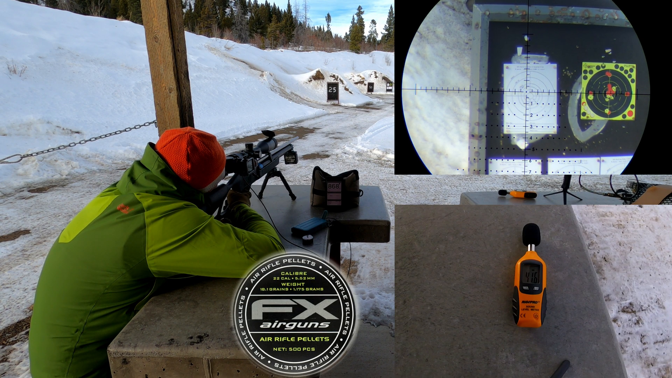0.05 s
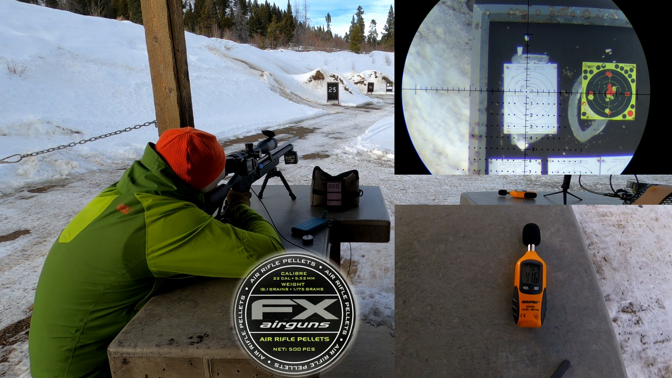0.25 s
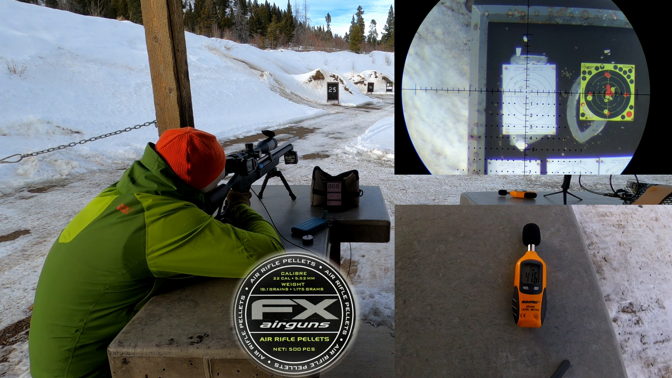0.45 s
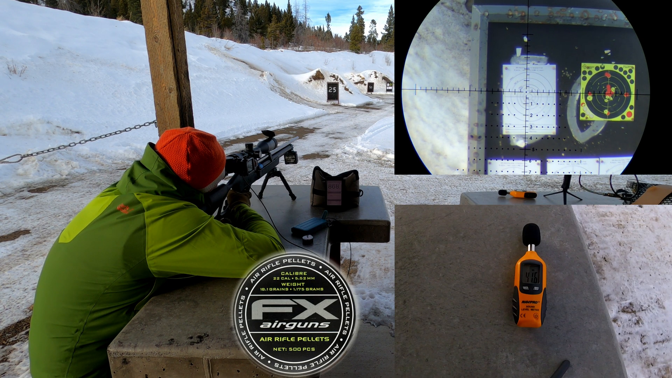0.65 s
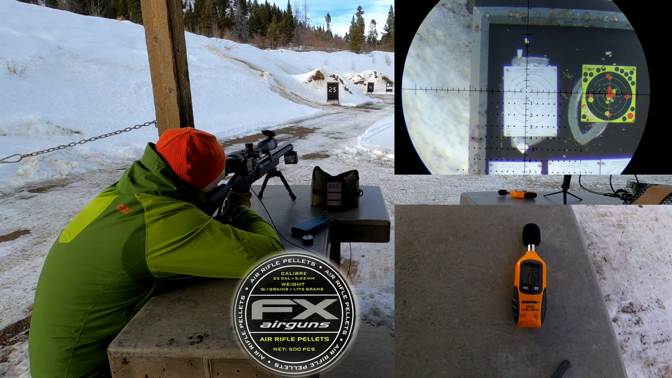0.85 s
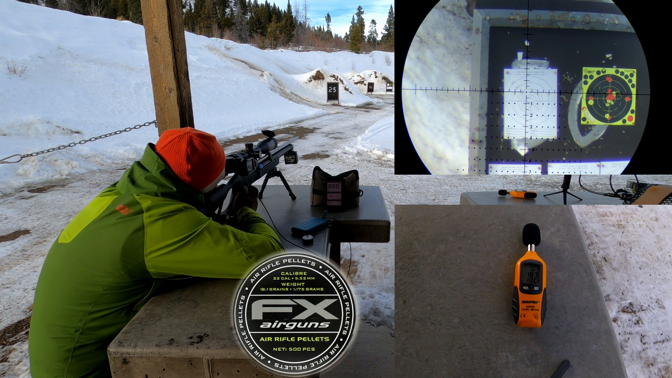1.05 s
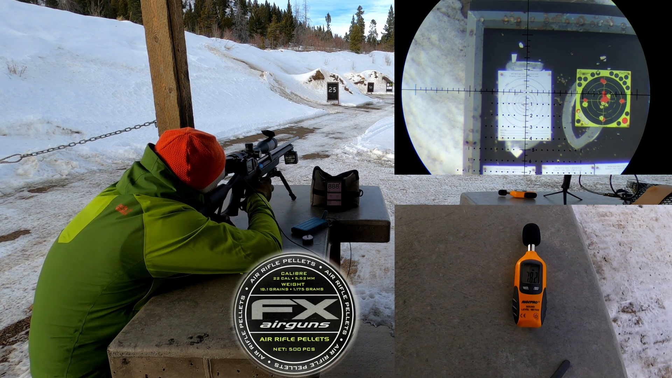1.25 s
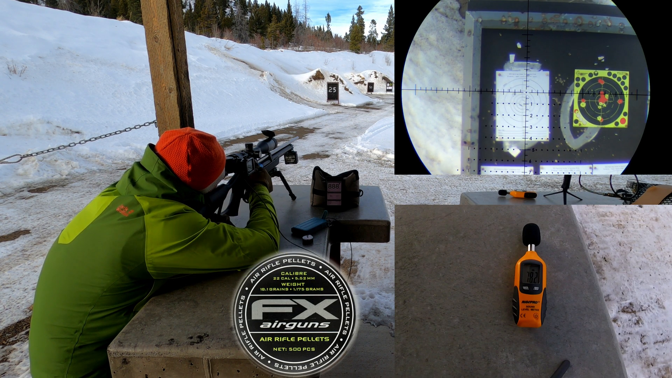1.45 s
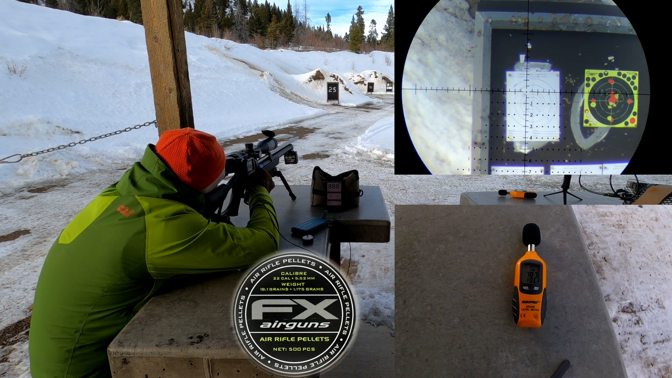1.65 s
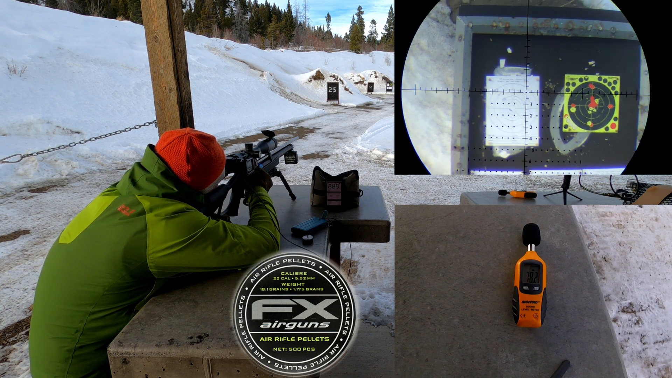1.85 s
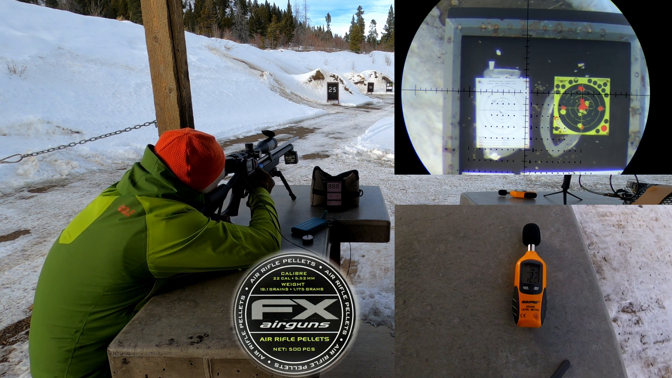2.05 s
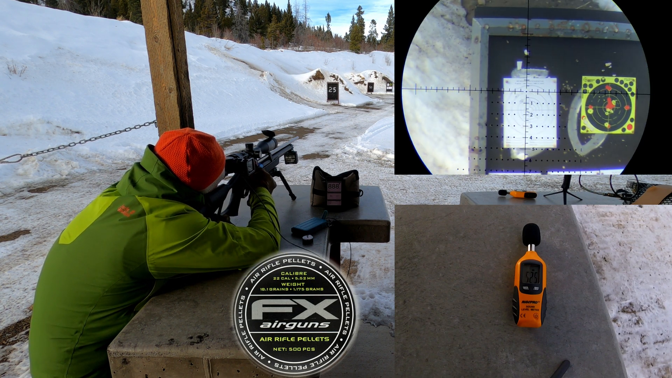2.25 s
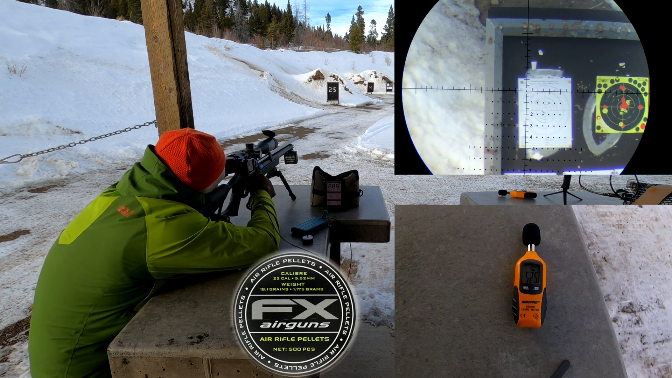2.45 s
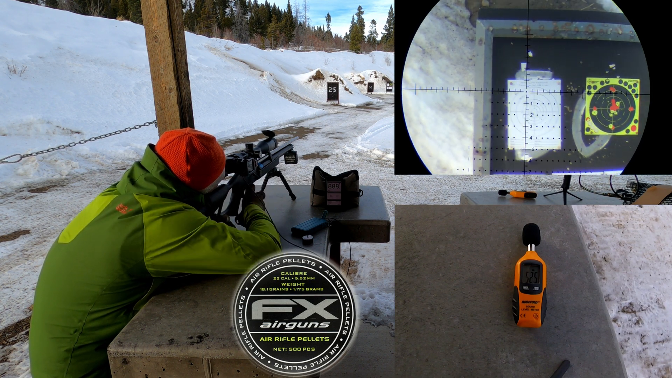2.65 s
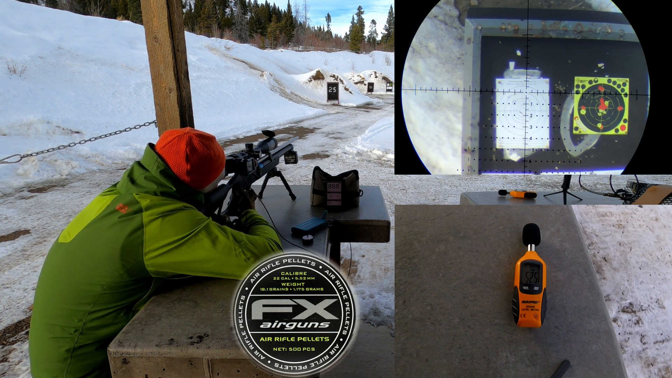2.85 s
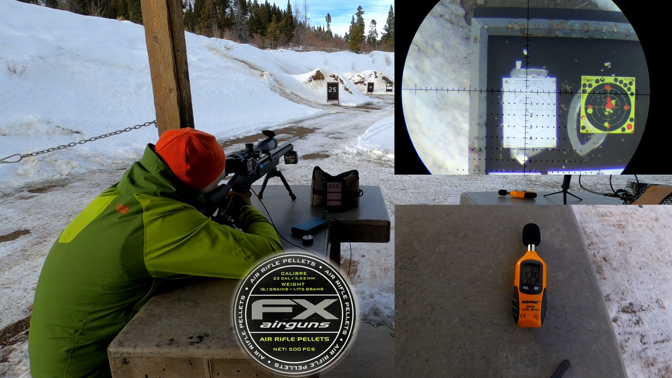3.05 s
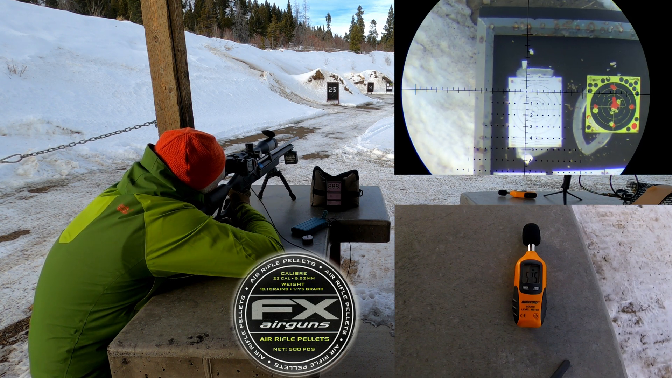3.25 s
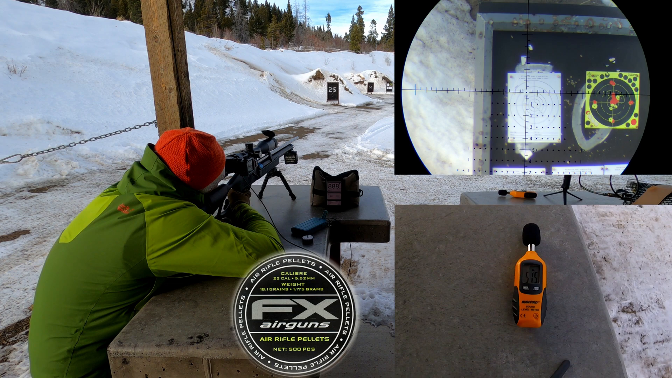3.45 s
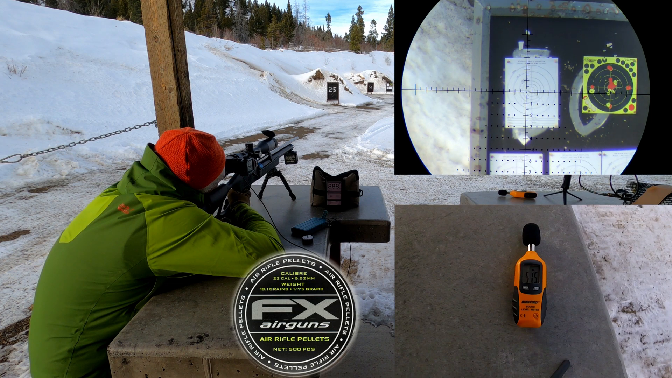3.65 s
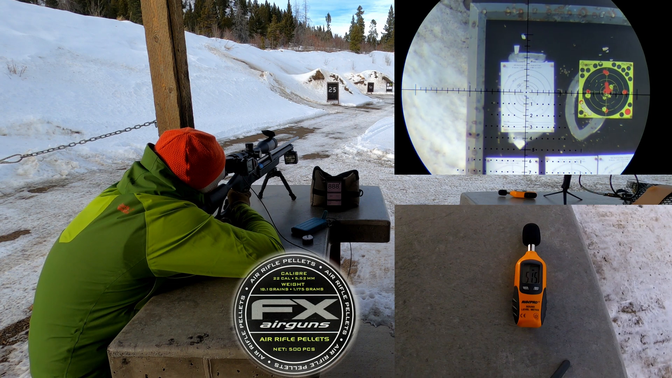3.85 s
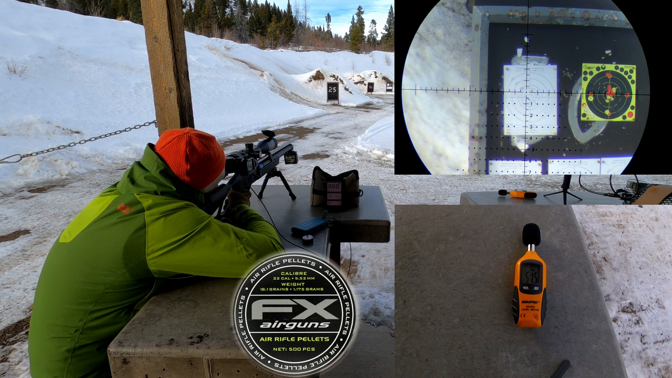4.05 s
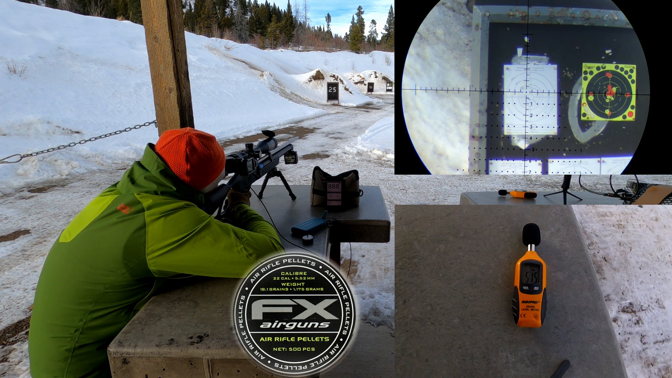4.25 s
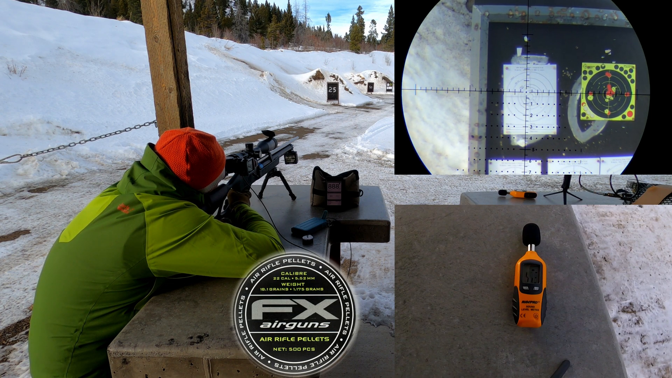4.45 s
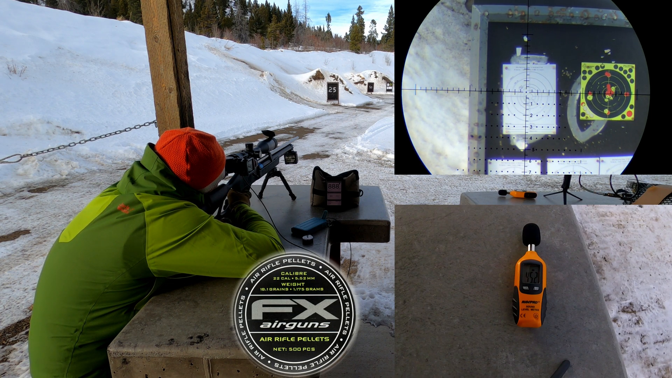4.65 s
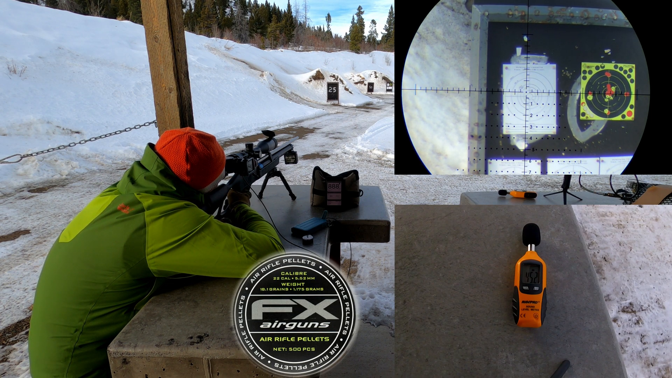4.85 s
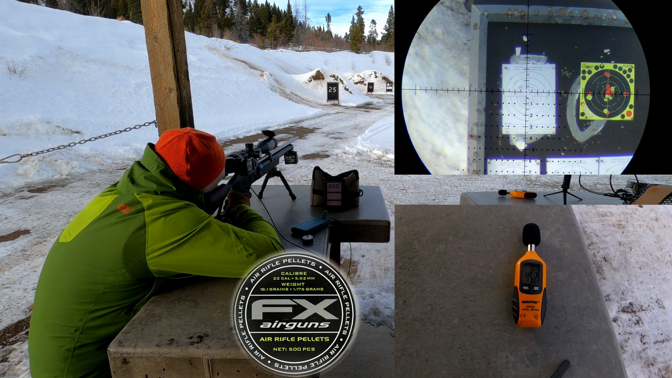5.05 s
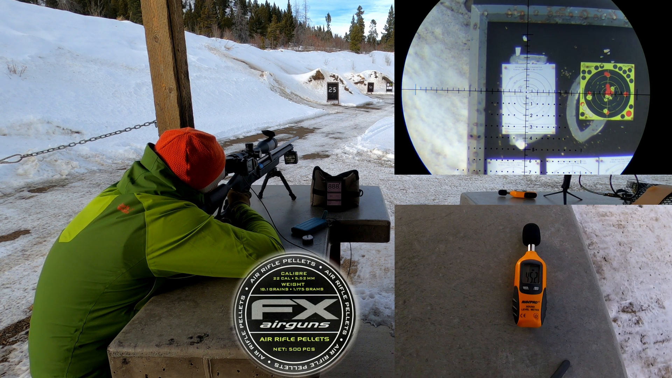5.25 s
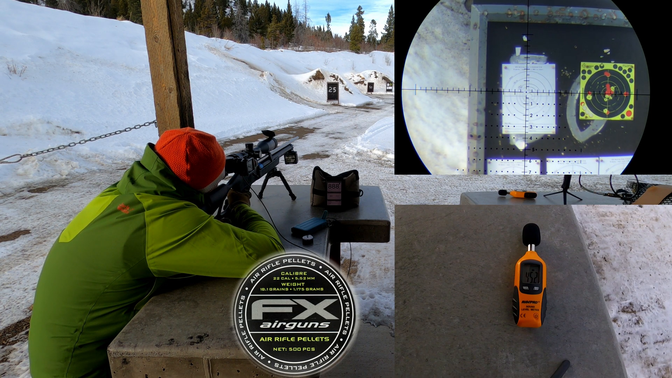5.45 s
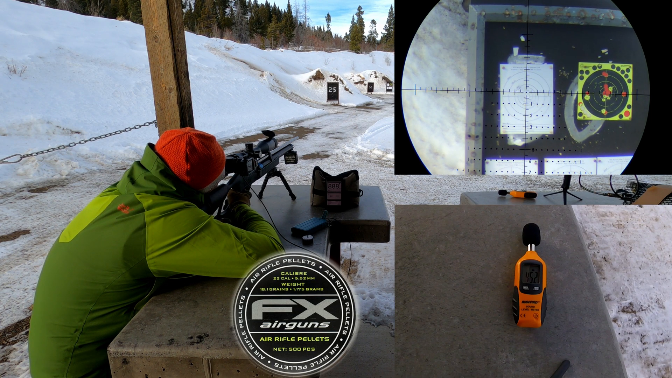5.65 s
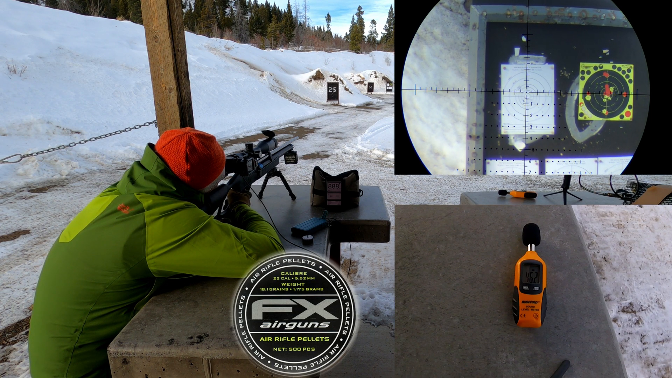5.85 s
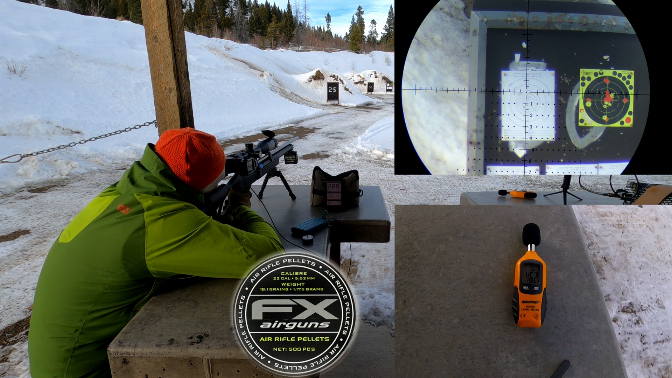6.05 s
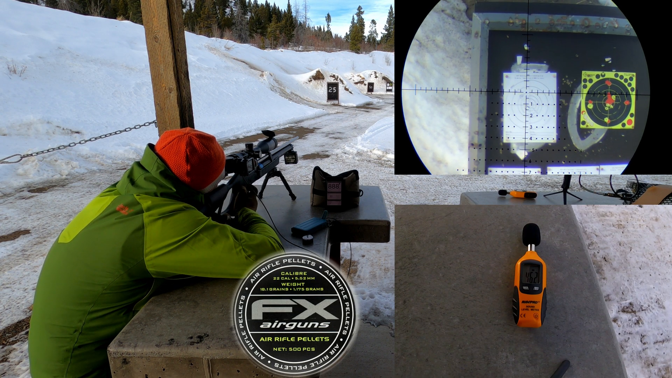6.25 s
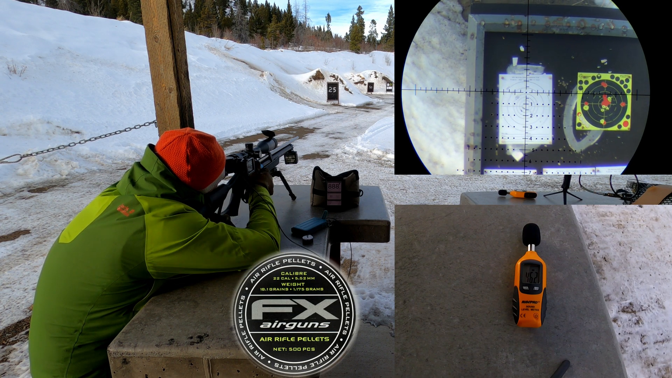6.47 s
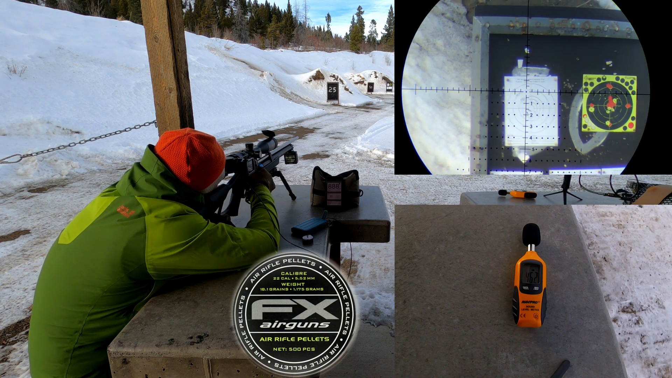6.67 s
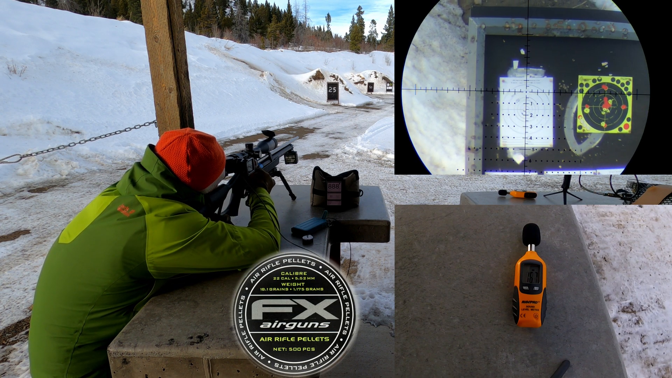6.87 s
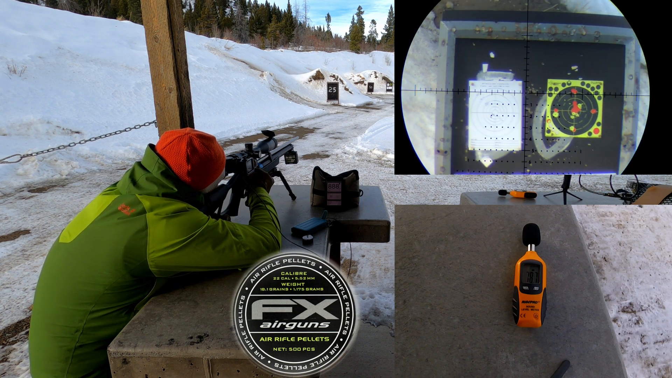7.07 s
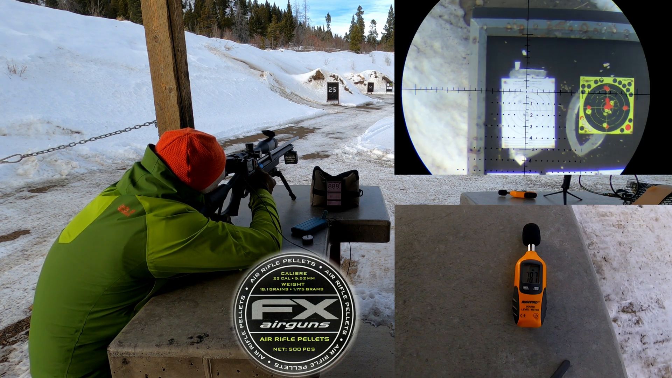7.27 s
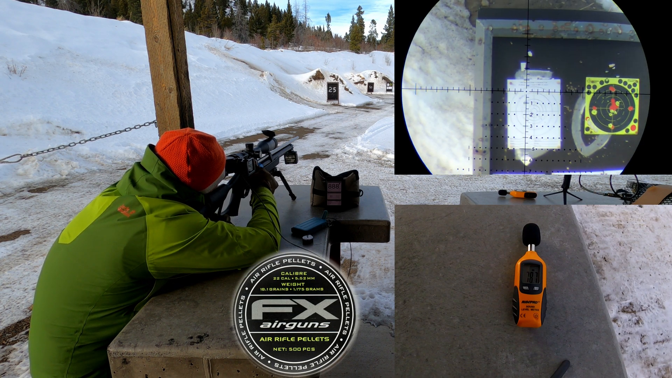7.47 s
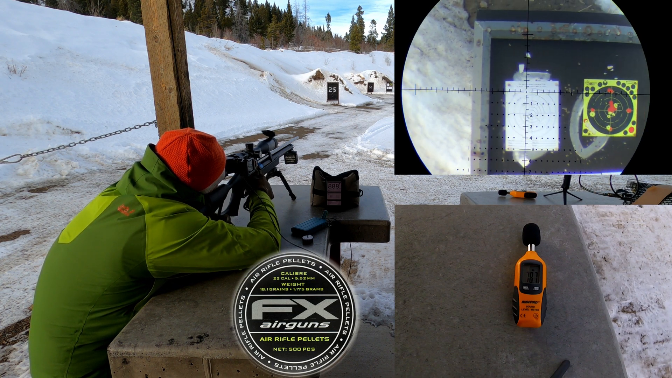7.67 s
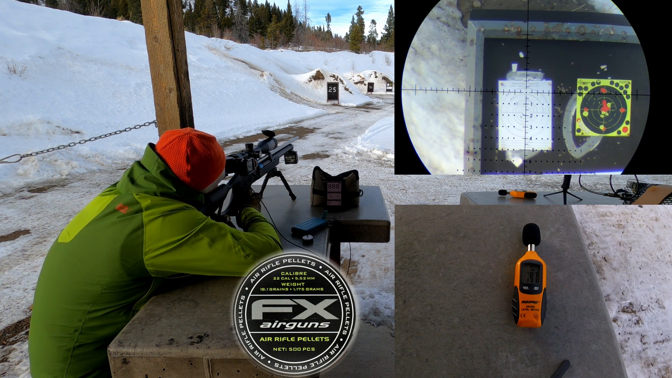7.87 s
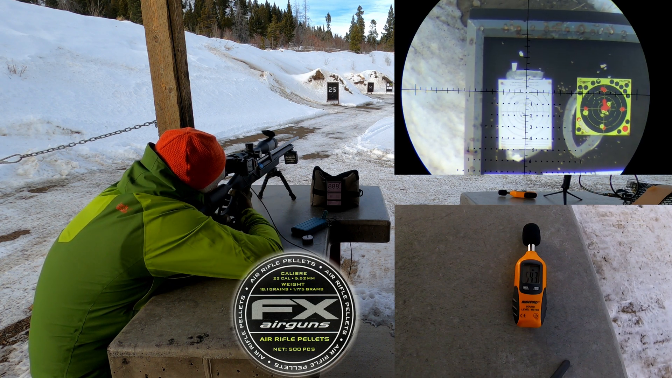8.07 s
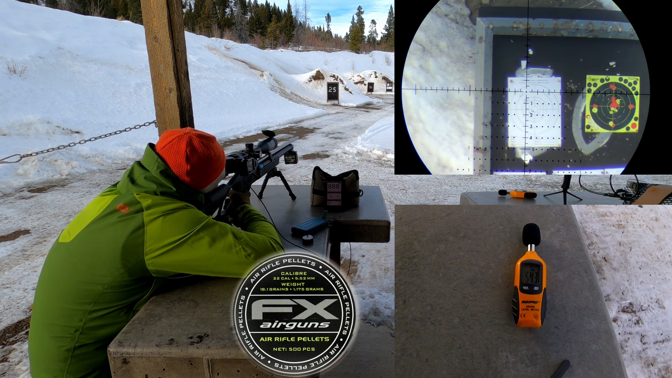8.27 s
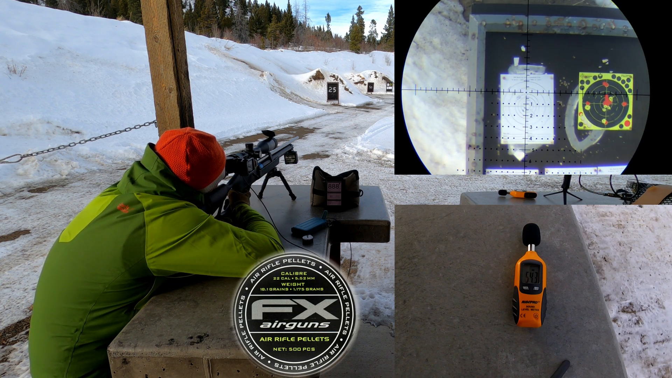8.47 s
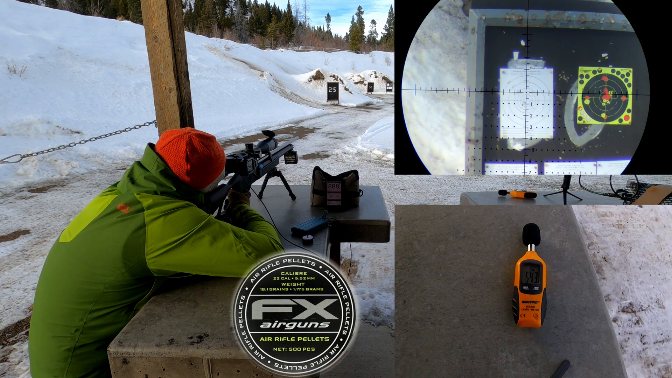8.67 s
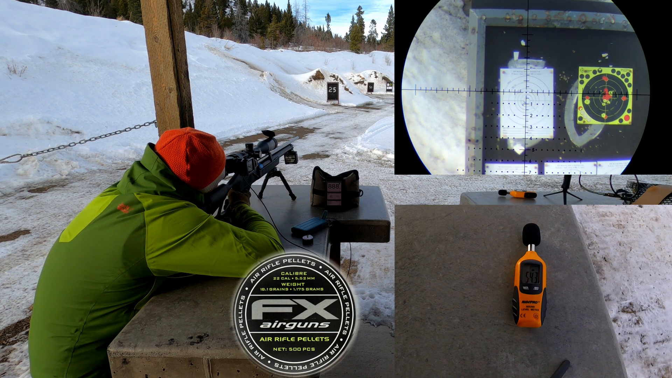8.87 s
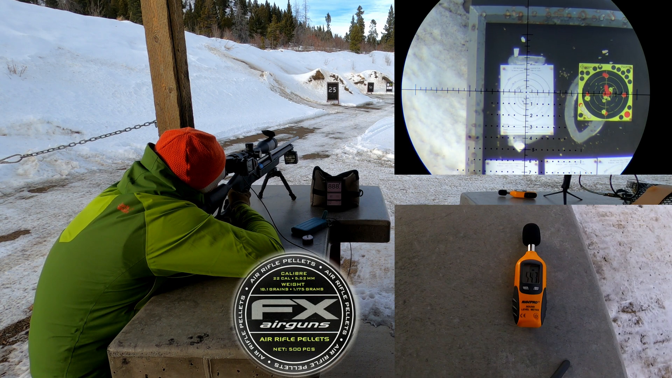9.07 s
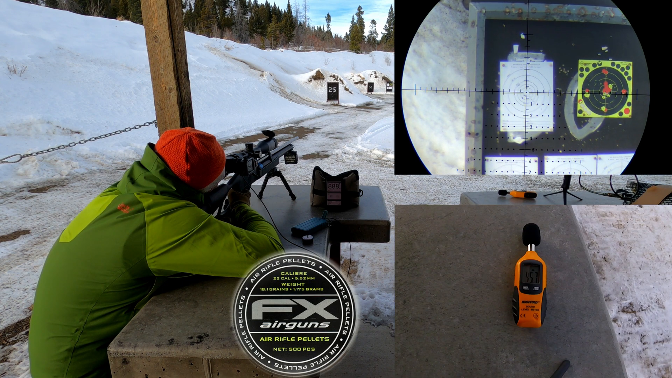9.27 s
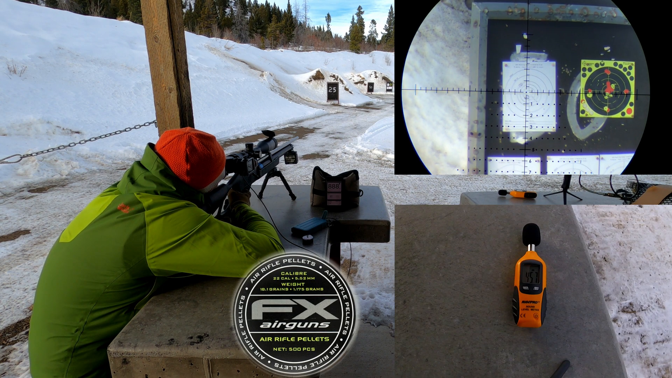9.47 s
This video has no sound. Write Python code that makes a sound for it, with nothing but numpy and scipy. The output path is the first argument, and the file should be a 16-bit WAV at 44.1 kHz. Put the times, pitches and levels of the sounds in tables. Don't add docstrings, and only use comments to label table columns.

```python
import sys
import numpy as np
from scipy import signal
from scipy.fft import rfft, irfft
from scipy.io import wavfile

SR = 44100
rng = np.random.default_rng(int(sys.argv[2]) if len(sys.argv) > 2 else 0)


def voltage_ratio(decibels):
    exponent = np.asarray(decibels, float) / 20
    return 10 ** exponent


def int16_out(signal):
    q = np.round(np.clip(np.atleast_2d(signal).T, -1, 1) * 32767)
    wavfile.write(sys.argv[1], SR, q.astype(np.int16))


N = 419832

# (time [s], strength [dB])
SHOTS = [
    (.352, 1),
    (5.6276, 2),
]

# (time [s], level [dB])
GUSTS = [(0, -47.5), (2.7, -47.5), (3.8, -48), (5.2, -48), (7.7, -48.5), (8.9, -47), (9.52, -45)]
# (frequency [Hz], density [dB per Hz])
WIND_COLOUR = [(15, -56), (25, -26), (59, -30.5), (86, -23), (119, -15.5), (156, -5.5), (281, -4.5),
               (380, 1), (900, 1.5), (1710, -5.5), (4150, -31), (5580, -34.5), (8350, -45.5), (11800, -45),
               (15500, -74)]
# (frequency [Hz], density [dB per Hz])
RUMBLE_COLOUR = [(15, -18.5), (30, -8.5), (60, -4.5), (100, -0.5), (160, -4), (300, -40.5)]

# (start [s], length [s], level [dB])
STROKES = [(1.203, 0.27, -71.5), (1.553, .95, -76), (2.603, 0.33, -58.5), (3.15, 0.19, -69),
           (3.42, 0.23, -80), (4.04, .06, -77), (6.352, 0.26, -70), (6.703, 0.6, -79), (7.298, 0.38, -72.5),
           (7.75, 0.34, -59.5), (8.239, 0.22, -70)]
# (frequency [Hz], density [dB per Hz])
CLOTH_COLOUR = [(1180, -24), (2000, -0.5), (2950, -3), (3210, -5), (4310, -5.5), (5980, -11), (8380, -20),
                (10400, -20), (15000, -42.5)]

# (frequency [Hz], level [dB], t60 [s])
ACTION_MODES = [(426, -20, 0.023), (790, -7.5, 0.012), (1145, -1.5, 0.012), (1583, -1, 0.014),
                (1830, 3.5, 0.015), (2118, 0, 0.017), (2390, 2, 0.012), (2780, -2, 0.019),
                (3350, -3, 0.013), (3740, -1.5, 0.0072), (4117, 0, 0.0079), (4800, -9.5, 0.017),
                (5780, -8.5, 0.0042), (6500, -7, 0.002), (7600, -35, 0.0051), (9170, -18, 0.005),
                (10560, -21, 0.005)]
# (time
# [s], peak [dB], favoured frequency [Hz])
GRIP = [(.963, -43.5, 1920), (6.15, -46, 2000), (7.394, -40, 2200), (1.498, -33, 3400), (1.5232, -36, 1470),
        (1.578, -41, 2160), (1.7041, -42, 1580), (1.8074, -38, 1800), (4.0984, -43, 1070),
        (6.684, -39.5, 2210), (6.8290, -35, 3000), (8.9205, -50, 1020)]
UNLATCH = [(1.7169, -35, 1970), (1.7284, -23.5, 1690), (1.7708, -30.5, 1240), (6.837, -22.5, 1610),
           (6.8446, -26, 2800)]
COCK = [(1.8673, -34, 1950), (1.8706, -20, 3900), (1.8866, -14.5, 1870), (1.9257, -23, 2030),
        (6.9829, -32, 1950), (6.9982, -17.5, 1930), (7.0456, -22, 1610)]
PUSH = [(2.143, -37, 1110), (2.1559, -27.5, 1160), (7.2749, -37, 1850), (7.2894, -21, 2220)]
FEED = [(2.3042, -21.5, 1720), (2.3205, -24.5, 1700), (2.374, -28, 1610), (2.3913, -26.5, 1930),
        (7.4295, -29, 1910), (7.4345, -28.5, 2100), (7.454, -25, 1670), (7.4832, -27, 2400),
        (7.4962, -19, 2190), (7.5194, -24.5, 1690)]
LATCH = [(2.4723, -21, 4170), (7.636, -24, 3960)]
LOCK = [(2.5316, -12.5, 1900), (7.6645, -10, 2340)]
TOUCH = [(2.1935, -33, 2000), (2.264, -38, 1750), (2.2715, -29, 2170), (2.2919, -30, 1870),
         (1.8822, -22.5, 4100), (2.5252, -26, 1730), (6.9912, -22.5, 3800), (7.6595, -29, 2400)]
TICKS = [(4.4383, -54, 6500), (7.939, -42, 4800)]
# (contacts, rattle t60 [s], brightness [dB per octave], rattle level [dB])
STAGES = [
    (GRIP, 0.18, -4, -4.5),
    (UNLATCH, 0.22, 0.86, -4.5),
    (COCK, 0.193, 2.9, -5),
    (PUSH, 0.17, -2.5, -5),
    (FEED, 0.21, .3, -4.5),
    (LATCH, 0.15, 2.3, -6),
    (LOCK, .15, 1.6, -6),
    (TOUCH, .08, .5, -7),
    (TICKS, .15, 10, -8),
]

# (time after trigger [s], peak [dB], frequency [Hz], crack above 4 kHz [dB], wash after it [dB])
RETURNS = [
    (.1553, -4.5, 1810, -12, -21.5),
    (.161, -14.5, 1300, -11, -42),
    (.170, -35, 1870, -20, -32),
    (.180, -25, 1880, -31, -41),
    (.2865, -29.5, 1300, -26, -15),
    (.336, -21, 1800, -0.5, -17),
    (.344, -30.5, 1100, -4, -12),
    (.3585, -27, 1150, -7, -17),
    (.4335, -36.5, 1700, -34, -26),
]
# (frequency [Hz], density [dB per Hz])
WASH_COLOUR = [(180, -28), (300, -6.5), (670, -11.5), (1100, 1), (1230, -4), (1910, -0.5), (3630, -12.5),
               (5880, -19), (14000, -63.5)]
# (time after trigger [s], level [dB], t60 [s])
THUDS = [
    (.026, -27.5, .3),
    (.163, -47, 0.29),
    (.336, -48, .15),
]
# (frequency [Hz], density [dB per Hz])
THUD_COLOUR = [(50, -36), (90, -19), (130, 2.6), (180, -4.5), (250, -0.5), (400, -39.5)]

# (time after trigger [s], peak [dB], frequency [Hz], length [cycles])
FIRING = [(-.0268, -45, 5000, 2.2), (-.0268, -47.5, 9200, 3.0), (-.0165, -36, 5002, 2.5),
          (-.0165, -46, 9200, 3.0), (-.006, -22, 5300, 2.5), (-.006, -35.5, 9210, 3.0),
          (.028, -29, 92, 1.8), (.0005, -19.5, 2167, 3.4), (.0045, -7, 1827, 1.6), (.0047, -8, 4600, 3.3),
          (.0098, -17, 900, 1.2), (0.011, -2.5, 1889, 1.6), (0.0127, -5.5, 2558, 2.1),
          (0.012, -4.5, 4800, 2.5), (.0155, 0.5, 4900, 3.2), (0.0152, -9.5, 9300, 6.2),
          (.0202, -11.5, 4400, 3.0), (.0204, -15, 700, 0.72), (0.0234, -13, 6500, 3.0)]
# (frequency [Hz], level [dB], t60 [s])
BENCH_MODES = [(131, -20, 0.28), (133, -11.5, 0.1), (215, -14, .14), (293, -14.5, 0.11), (525, -19, 0.1)]
# (frequency [Hz], density [dB per Hz])
BLAST_COLOUR = [(240, -25), (400, -2), (543, -9.5), (614, -10), (784, -10), (1790, -4.5), (3110, -8.5),
                (6090, -7.5), (10400, -15), (15500, -39.5)]
# (frequency [Hz], t60 [s])
BLAST_DECAY = [(500, 0.29), (1500, 0.26), (4000, 0.27), (8000, 0.21), (15000, 0.19)]

DUCK_DB, DUCK_FALL_S, RECOVER_DB_PER_S, DUCK_LEAN = 15.5, 0.17, 7.3, 0.08
STROKE_RISE_S, STROKE_FALL_S, REST_DB = 0.096, 0.073, -80
CREEP_DB, CREEP_DB_PER_S = -50.5, 551
RETURN_CYCLES, RETURN_SPREAD_DB = 1.9, 0.1
BLAST_DB, TRAVEL_DB = -17.5, -13.5
BENCH_DELAY_S, BENCH_STIFF_S, BENCH_SHARP_HZ = 0.014, 0.018, 40.0


def at_hz(points, hz):
    table_hz, values = np.transpose(points)
    return np.interp(np.log(np.maximum(hz, 1)), np.log(table_hz), values)


def coloured(spectrum, size):
    hz = np.arange(size // 2 + 1) * SR / size
    x = irfft(rfft(rng.standard_normal(size)) * voltage_ratio(at_hz(spectrum, hz)), size)
    return x / x.std()


def drift(rate):
    knots = rng.standard_normal(int(N / SR * 40) + 2)
    return np.interp(np.arange(N) / SR * rate, np.arange(len(knots)), knots)


def bands(x):
    spectrum = rfft(x)
    octave = np.log2(np.arange(len(x) // 2 + 1) * SR / len(x) + 1)
    return [(2. ** k, irfft(spectrum * np.maximum(1 - abs(octave - k), 0), len(x))) for k in range(4, 15)]


def band_pass(x, low_hz, high_hz):
    return signal.sosfilt(signal.butter(3, [low_hz, high_hz], "band", fs=SR, output="sos"), x + 1e-18)


def add(track, s, sound):
    i = round(s * SR)
    track[i:i + len(sound)] += sound[:N - i]


def pulse(hz, cycles):
    t = np.arange(-.003, .02, 1 / SR)
    steeper_rise = np.where(t < 0, 2, 1)
    return np.cos(2 * np.pi * hz * t) * np.exp(-(t * hz / cycles * 2) ** 2 * steeper_rise)


def dying(t, t60, rise_s):
    return voltage_ratio(-60 * t / t60) * (1 - np.exp(-t / rise_s))


def duck_db():
    after = np.maximum(np.arange(N) / SR - np.array(SHOTS)[:, :1], 0)
    fall = DUCK_DB * (1 - np.exp(-(after / DUCK_FALL_S) ** 2))
    return np.maximum(fall - RECOVER_DB_PER_S * after, 0).max(0)


def wind():
    gust_db = np.interp(np.arange(N) / SR, *np.transpose(GUSTS)) + 1.0
    duck = duck_db()
    out = np.zeros(N)
    for hz, band in bands(coloured(WIND_COLOUR, N)):
        turned_down = duck * (1 - DUCK_LEAN * np.log2(hz / 600))
        breath = 0.69 * drift(2.3) + 1.6 * drift(13.0)
        out += band * voltage_ratio(gust_db - turned_down + breath)
    return out


def rumble():
    return voltage_ratio(-76.5 - 0.37 * duck_db() + 3.5 * drift(3.4)) * coloured(RUMBLE_COLOUR, N)


def sleeve():
    t = np.arange(N) / SR
    gain = np.full(N, voltage_ratio(REST_DB))
    for s, length, db in STROKES:
        rise = np.maximum(s + STROKE_RISE_S - t, 0) / STROKE_RISE_S
        fall = np.maximum(t - s - length, 0) / STROKE_FALL_S
        gain += voltage_ratio(db) * np.exp(-rise ** 2 - fall ** 2)
    for s, _ in SHOTS:
        gain += voltage_ratio(CREEP_DB - CREEP_DB_PER_S * abs(s - t)) * (t < s)
    grain = voltage_ratio(6.0 + 1.0 * drift(24.0) + 1.5 * drift(7.0))
    return gain * grain * coloured(CLOTH_COLOUR, N)


def contact(spot_hz, t60, bright_db, rattle_db):
    t = np.arange(SR // 4) / SR
    size = len(t)
    chatter = dying(t, 0.018, 0.0002995)
    tail = voltage_ratio(min(rattle_db, 0)) * dying(t, max(t60, .02), 0.0025)
    heights = voltage_ratio(2.0 * np.minimum(rng.exponential(1, size), 2))
    ticks = (rng.random(size) < 900 / SR) * heights * rng.choice([-1, 1], size)
    sound = np.zeros(size)
    for hz, level_db, ring_s in ACTION_MODES:
        r, w = voltage_ratio(-60 / (ring_s * SR)), 2 * np.pi * hz / SR
        scatter = rng.standard_normal(size) * np.sqrt(1 - r * r)
        force = scatter * (tail + 1.1 * chatter)
        force += ticks * (0.3 * tail + 0.527 * chatter) * rng.choice([-1, 1])
        force[rng.integers(0, 12)] += rng.choice([-1, 1])
        soft = np.exp(-1.5 * w)
        force = signal.lfilter([1 - soft], [1, -soft], force)
        favour_db = 6.8 * np.exp(-(np.log2(hz / spot_hz) / 0.13) ** 2)
        gain = voltage_ratio(level_db + bright_db * np.log2(hz / 2000) + favour_db)
        sound += gain * signal.lfilter([.5, 0, -.5], [1, -2 * r * np.cos(w), r * r], force)
    return sound / (3.47 * sound[:SR // 100].std())


def lever():
    out = np.zeros(N)
    for contacts, t60, bright_db, rattle_db in STAGES:
        for s, db, spot_hz in contacts:
            add(out, s + .001, voltage_ratio(db) * contact(spot_hz, t60, bright_db, rattle_db))
    return band_pass(band_pass(out, low_hz=243, high_hz=11700), low_hz=148, high_hz=14500)


def returns():
    out, low, t = np.zeros(N), np.zeros(N), np.arange(SR // 4) / SR
    for shot_s, _ in SHOTS:
        for lag, db, hz, crack_db, wash_db in RETURNS:
            s, db = shot_s + lag, db + rng.normal(0, RETURN_SPREAD_DB)
            treble = 0.6 * pulse(6700, 5.5) + 0.26 * pulse(9800, 4.6)
            crack = pulse(4480, 3.5) + voltage_ratio(.5 * crack_db) * treble
            add(out, s - .002, voltage_ratio(db) * (pulse(hz, RETURN_CYCLES) + voltage_ratio(crack_db) * crack))
            grain = voltage_ratio(1.8 * np.interp(t * 400, np.arange(200), rng.standard_normal(200)))
            bright_wash = voltage_ratio(2.0 * crack_db - 4) * coloured(BLAST_COLOUR, len(t))
            wash = (coloured(WASH_COLOUR, len(t)) + bright_wash) * grain * dying(t, .17, 0.00075)
            add(out, s + .001, voltage_ratio(db + wash_db) * wash)
        for lag, db, t60 in THUDS:
            add(low, shot_s + lag, voltage_ratio(db) * coloured(THUD_COLOUR, len(t)) * dying(t, t60, 0.0088))
    return band_pass(out, low_hz=375.7, high_hz=11530) + low


def hammer_travel(t):
    noise = band_pass(coloured(BLAST_COLOUR, len(t)), low_hz=500, high_hz=9000)
    return noise * dying(t, 0.11, 0.009) * np.minimum(t / 0.0096, 1)


def air_blast(t):
    blast = np.zeros(len(t))
    for hz, band in bands(coloured(BLAST_COLOUR, len(t))):
        blast += band * dying(t, at_hz(BLAST_DECAY, hz), .002)
    return band_pass(blast, low_hz=199, high_hz=12700)


def bench_thump(t):
    extra_cycles = BENCH_SHARP_HZ * BENCH_STIFF_S * (1 - np.exp(-t / BENCH_STIFF_S))
    thump = np.zeros(len(t))
    for hz, db, t60 in BENCH_MODES:
        thump += voltage_ratio(db) * np.sin(2 * np.pi * (hz * t + extra_cycles)) * dying(t, t60, 0.011)
    return thump


def shots():
    out, t = np.zeros(N), np.arange(SR // 2) / SR
    for s, db in SHOTS:
        for lag, peak_db, hz, cycles in FIRING:
            add(out, s + lag - .003, voltage_ratio(db + peak_db) * pulse(hz, cycles))
        add(out, s - .004, voltage_ratio(db + TRAVEL_DB) * hammer_travel(t))
        add(out, s + .011, voltage_ratio(db + BLAST_DB) * air_blast(t))
        add(out, s + BENCH_DELAY_S, voltage_ratio(db) * bench_thump(t))
    return out


def scene():
    mono = wind() + rumble() + sleeve() + lever() + returns() + shots()
    return np.array([mono, mono])


def band_limit(x):
    return signal.sosfilt(signal.butter(12, 15710, fs=SR, output="sos"), x)


def record(dry):
    rough = band_pass(dry[0], 11000, 15500) * rng.standard_normal(N)
    residue = voltage_ratio(0.5) * band_pass(rough, 11000, 15000)
    hiss = voltage_ratio(-93.5) * signal.lfilter([1, -1], [1], rng.standard_normal(dry.shape))
    dulled = signal.sosfilt(signal.butter(6, 15000, fs=SR, output="sos"), dry)
    wet = dulled + hiss + residue * [[1], [-1]]
    return band_limit(np.clip(wet, -1, 1))


dry = scene()
out = record(dry)
int16_out(out)
```